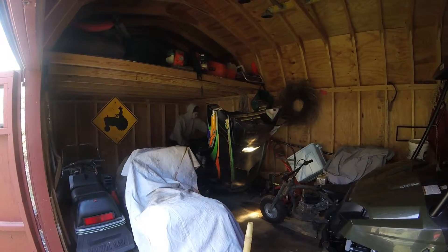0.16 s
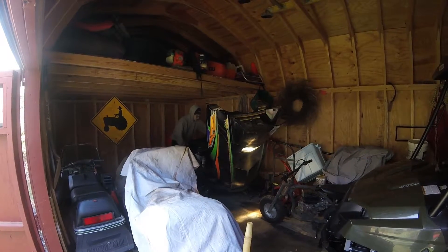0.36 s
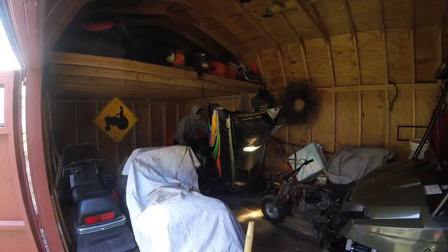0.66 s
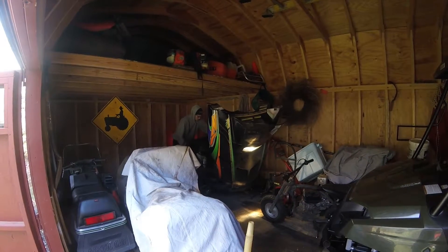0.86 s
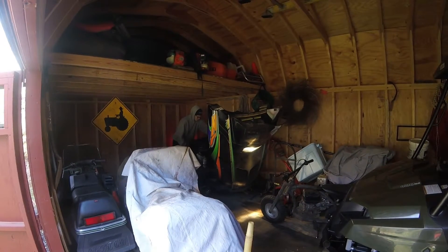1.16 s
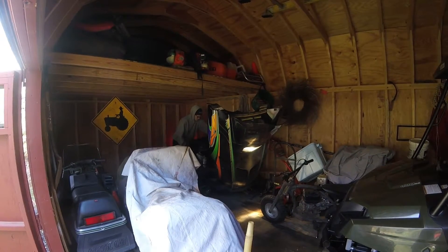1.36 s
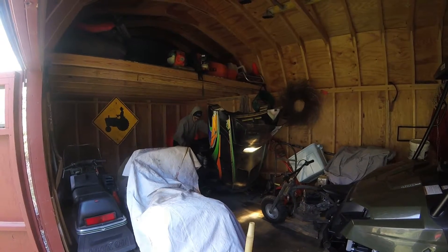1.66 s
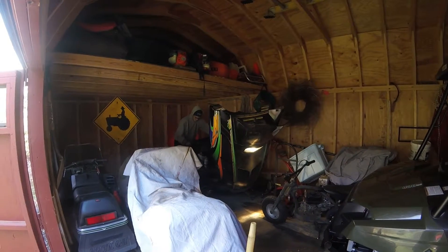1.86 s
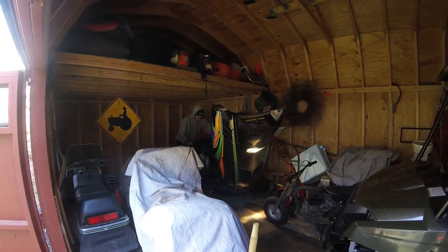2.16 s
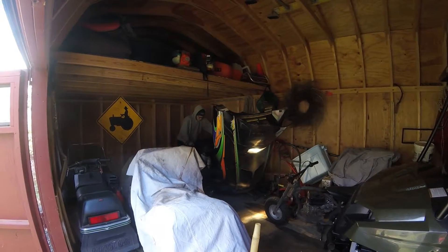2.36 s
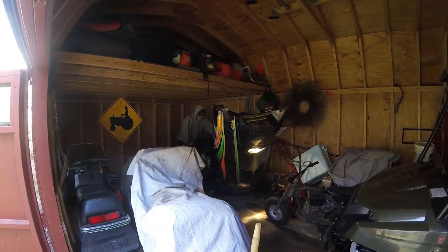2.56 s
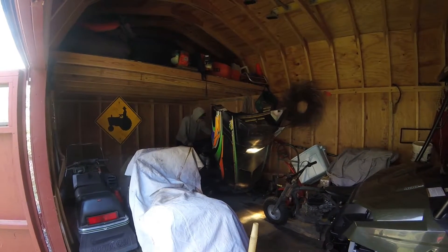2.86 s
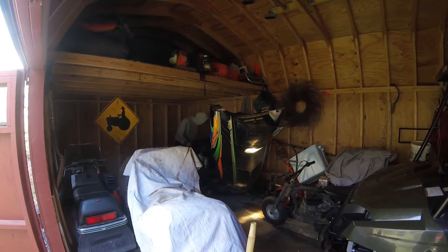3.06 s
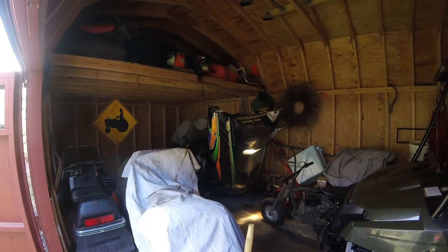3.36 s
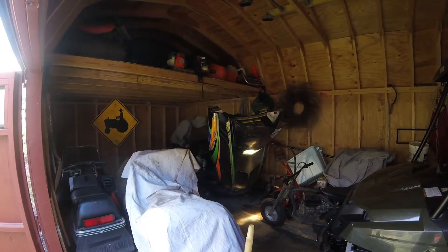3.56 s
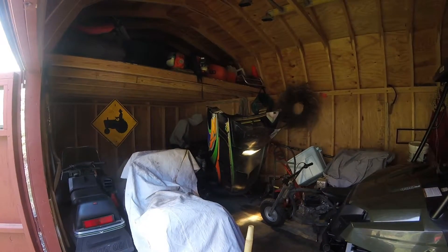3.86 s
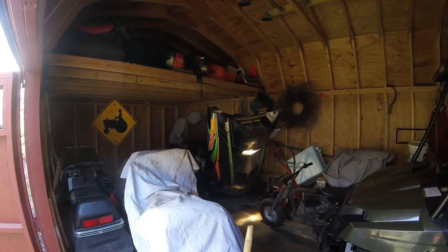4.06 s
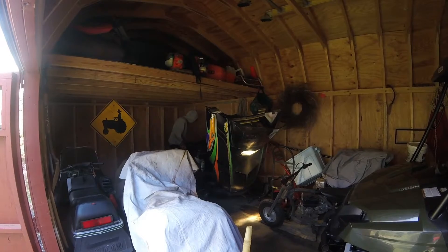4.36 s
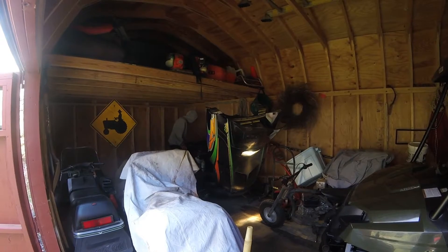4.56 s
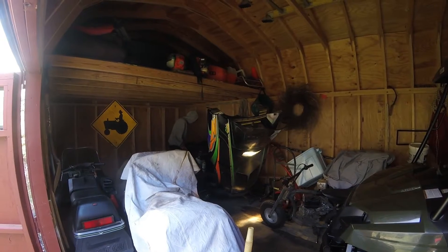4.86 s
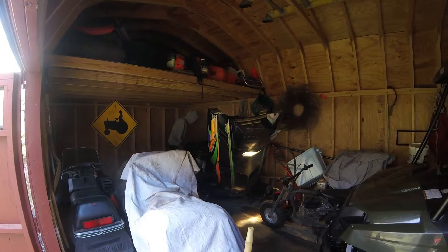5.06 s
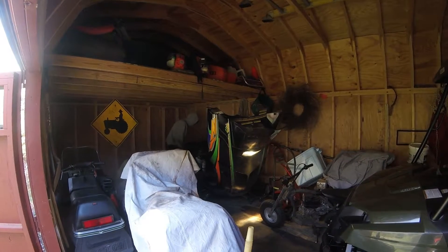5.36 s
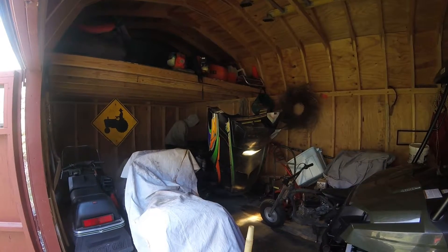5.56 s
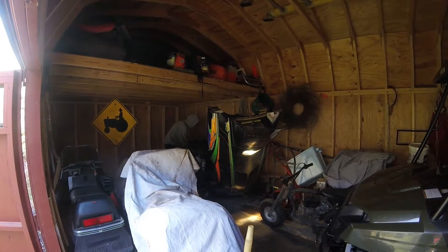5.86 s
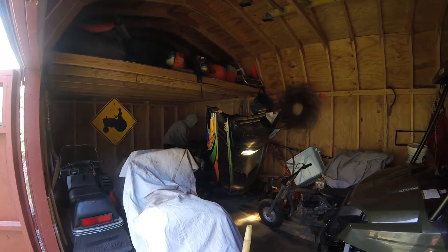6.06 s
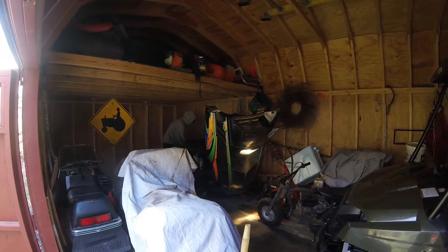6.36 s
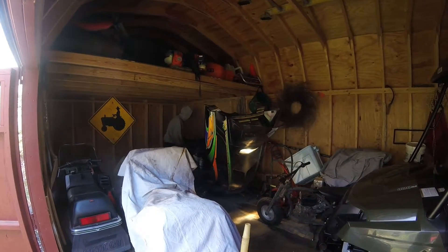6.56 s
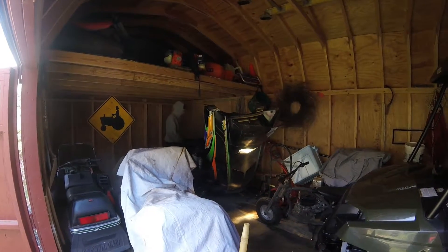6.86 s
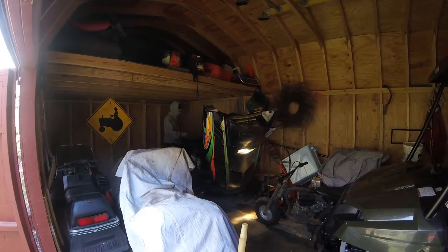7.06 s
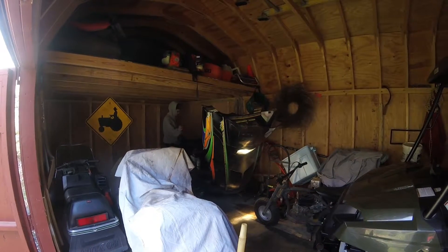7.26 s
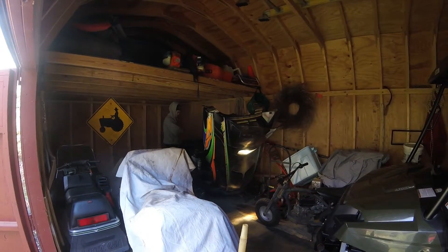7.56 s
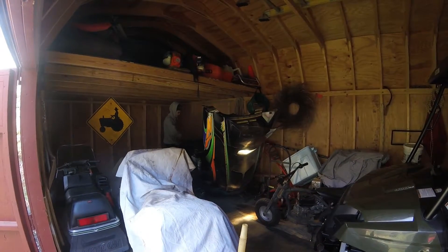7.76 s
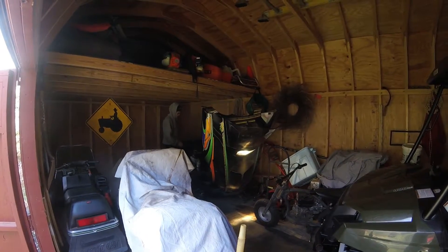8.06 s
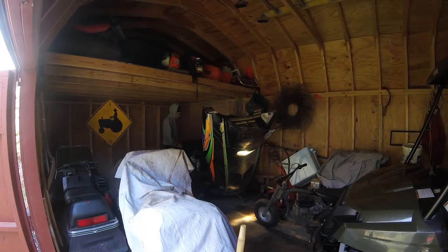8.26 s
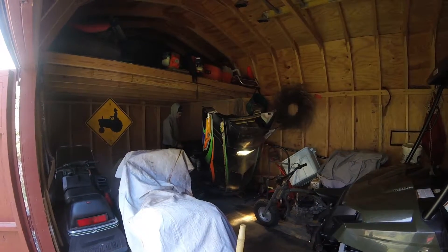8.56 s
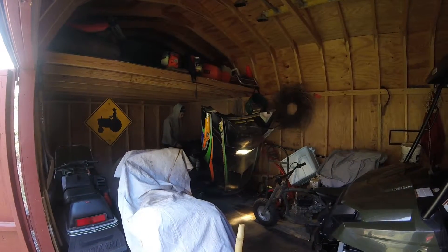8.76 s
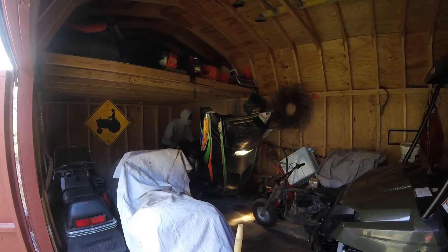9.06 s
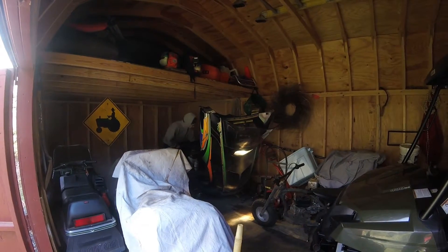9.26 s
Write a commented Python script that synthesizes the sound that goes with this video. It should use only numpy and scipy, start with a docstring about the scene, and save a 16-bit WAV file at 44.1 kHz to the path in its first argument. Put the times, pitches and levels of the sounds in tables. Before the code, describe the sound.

A two-stroke snowmobile engine is already idling at the start and runs without a break for about nine and a half seconds. Its exhaust makes a low, fast chug, topped by hollow, ringing pops at an uneven pace. Hard firings come roughly eight or nine times a second, each bringing a metallic knock and a bright jangle of loose parts. Panels hum on two wavering notes, sheet metal rings lightly, and faint, very high squeaks recur throughout. At about 0.8 and 1.3 seconds come two low, hollow gulps, and the drone dips briefly around 1.4 seconds. The engine runs a little softer until about 2 seconds, recovers by 3, and knocks and rattles slightly harder from about 6 seconds to the end. It is heard in mono on one microphone inside a wooden shed, with tight reflections and a slowly growing low boom.

```python
"""Snowmobile idling in a shed

A two-stroke warms up unevenly between close plank walls, heard on one microphone. Every stroke puffs
through the exhaust, but only some fire hard: the pipe pops, and the engine jerks, knocks and shakes
its loose drive parts. Panels hum, metal squeaks, the air booms. Twice, early on, comes a low gulp."""
import sys
import numpy as np
from scipy import signal
from scipy.fft import rfft, irfft
from scipy.io import wavfile

SR = 44100
rng = np.random.default_rng(int(sys.argv[2]) if len(sys.argv) > 2 else 0)


def bounce(signal):
    """Save signal as a 16-bit WAV file at the path given by the first command-line argument."""
    frames = np.transpose(np.atleast_2d(signal))
    limited = np.clip(frames, -1, 1)
    pcm = np.round(limited * 32767).astype(np.int16)
    wavfile.write(sys.argv[1], SR, pcm)


N = 415863
TIME = np.arange(N) / SR


def gain_of(db):
    """Decibels to amplitude."""
    return 10 ** (np.asarray(db) / 20)


def unit_rms(x):
    """Scales to rms 1."""
    return x / np.sqrt(np.mean(x ** 2) + 1e-20)


def curve(table, at=TIME):
    """Straight lines between the (time, value) rows of a table."""
    return np.interp(at, *np.transpose(table))


def bell(t, width):
    """A smooth bump of height 1 around t = 0."""
    return np.exp(-.5 * (t / width) ** 2)


def wander(hz, size=32768, step=16):
    """Slow random motion of rms 1, up to about hz."""
    rolloff = np.exp(-(np.fft.rfftfreq(size, step / SR) / hz) ** 2)
    slow = irfft(rfft(rng.standard_normal(size)) * rolloff)
    return unit_rms(np.interp(TIME, np.arange(size) * step / SR, slow))


def clicks(times, sizes):
    """A train of single impulses."""
    return np.bincount(np.clip(np.round(times * SR).astype(int), 0, N), sizes, N + 1)[:N]


def through(x, impulse):
    """Plays x through an impulse response."""
    return signal.oaconvolve(x, impulse)[:N]


def causal(gain):
    """Gives a gain per frequency the phase of a real body, which cannot ring before it is struck."""
    cepstrum = irfft(np.log(gain + 1e-12))
    half = len(cepstrum) // 2
    cepstrum[1:half] *= 2
    cepstrum[half + 1:] = 0
    return np.exp(rfft(cepstrum))


def body(spectrum, modes=(), size=16384):
    """Impulse response of a body with a broad spectrum and narrow resonances."""
    hz = np.fft.rfftfreq(size, 1 / SR)
    knot_hz, knot_db = np.transpose(spectrum)
    db = np.interp(np.log(hz + 1), np.log(knot_hz), knot_db)
    for centre, width, height in modes:
        db += height / (1 + (2 * (hz - centre) / width) ** 2)
    return irfft(causal(gain_of(db)))[:size // 2]


def shed(x, wet_db, t60=0.1, size=32768):
    """Close plank walls send a short, dense tail to the microphone, 3 ms behind the direct sound."""
    t = np.arange(size) / SR
    echoes = rng.standard_normal(size) * (rng.random(size) < .1)
    echoes *= gain_of(-60 * t / t60) * (t > .003)
    room = rfft(gain_of(wet_db) * echoes / np.linalg.norm(echoes) + (t == 0))
    # a large source sounds from many places, which evens out most of the room's peaks and dips
    impulse = irfft(room / causal(abs(room) ** .7))[:size // 2]
    return through(x, impulse / np.linalg.norm(impulse))


# how hard the engine runs between hard firings: t/s, level/dB
EFFORT = [(0, 3.5), (.6, -0.26), (1.05, -1.15), (1.6, -2.5), (2.9, 0), (4.5, 0), (5.3, -1.09), (6.3, .5),
          (8.3, 1), (9.43, -0.05)]
def running(db, follow):
    """Gain of a steady layer that follows the engine's effort by its own amount."""
    return gain_of(db + follow * curve(EFFORT))


# hard firings, each a jerk of the engine: t/s, knock level/dB, rattle level/dB
HARD_FIRINGS = [(.049, -31, -33.5), (.18, -31, -33), (.26, -37, -41.5), (.339, -31.5, -35),
                (.471, -34, -38), (.55, -36.5, -43), (.614, -32.5, -36), (0.732, -29.5, -37),
                (0.786, -31.5, -39), (.872, -36, -38), (.96, -36, -42), (1.056, -38, -42.5),
                (1.167, -31, -37.5), (1.232, -27.5, -37), (1.384, -33, -42), (1.549, -35, -42.5),
                (1.647, -33, -39.5), (1.767, -33.5, -38.5), (1.879, -33.5, -40), (1.992, -34, -40.5),
                (2.106, -32, -37.5), (2.258, -31.5, -37), (2.385, -30, -37), (2.522, -34, -37.5),
                (2.633, -32.5, -36.5), (2.74, -35, -40.5), (2.831, -31.5, -36.5), (2.942, -32, -39.5),
                (2.989, -34, -37), (3.061, -31.5, -36), (3.163, -31.5, -38), (3.268, -32, -37),
                (3.342, -33, -39), (3.415, -31, -35), (3.565, -26.5, -32.5), (3.693, -31.5, -39),
                (3.869, -36.5, -37.5), (4.002, -33.5, -38), (4.076, -32, -41), (4.173, -33.5, -38.5),
                (4.304, -31.5, -39), (4.391, -32.5, -36), (4.505, -30.5, -35), (4.645, -27.5, -36),
                (4.791, -29, -34.5), (4.923, -36, -38.5), (5.026, -34, -43), (5.132, -33.5, -36.5),
                (5.257, -32.5, -39), (5.364, -35.5, -42), (5.438, -32.5, -36.5), (5.584, -33.5, -37.5),
                (5.734, -27.5, -34.5), (5.863, -30, -35.5), (5.958, -30.5, -35.5), (6.133, -30.5, -34.5),
                (6.277, -30.5, -35), (6.357, -31.5, -37.5), (6.459, -32, -38), (6.582, -28.5, -34.5),
                (6.71, -31.5, -34), (6.844, -34.5, -40), (6.926, -29, -35), (7.054, -28, -35),
                (7.136, -38, -40), (7.219, -30, -35), (7.341, -30, -35.5), (7.457, -29, -33),
                (7.601, -30.5, -34.5), (7.66, -33.5, -40), (7.753, -28.5, -30.5), (7.892, -29.5, -31.5),
                (8.031, -31.5, -35), (8.187, -29.5, -34.5), (8.336, -29.5, -34.5), (8.449, -33, -38),
                (8.545, -28, -35), (8.632, -33, -42.5), (8.714, -28.5, -34), (8.857, -27, -32.5),
                (8.94, -34.5, -38), (9.005, -30, -41), (9.046, -29.5, -34.5), (9.164, -24.5, -31),
                (9.295, -28, -35)]
KNOCK, RATTLE = 1, 2  # columns
def firings(weak_gap_s=.055, jitter_s=.0054, spread_db=2, fade_db_per_s=-32, knock_db=-41, rattle_db=-45):
    """The hard firings, plus rows for weak ones that die down across each gap."""
    rows = list(HARD_FIRINGS)
    edges = [0] + [row[0] for row in HARD_FIRINGS] + [N / SR]
    for start, end in zip(edges, edges[1:]):
        for s in np.linspace(start, end, round((end - start) / weak_gap_s) + 1)[1:-1]:
            late, strength = rng.standard_normal(2)
            db = curve(EFFORT, s) + fade_db_per_s * (s - start) + spread_db * strength
            rows.append((s + jitter_s * late, knock_db + db, rattle_db + db))
    return np.array(rows)


def throb(*bumps, width_s, reach=8192):
    """Gain around each hard firing: bumps (offset/s, height/dB), of which only +-0.19 s acts."""
    t = np.arange(-reach, reach + 1) / SR
    shape_db = sum(db * bell(t - offset, width_s) for offset, db in bumps)
    jerks = clicks(np.array(HARD_FIRINGS)[:, 0], np.ones(len(HARD_FIRINGS)))
    return unit_rms(gain_of(signal.oaconvolve(jerks, shape_db, "same")))


def shaking(fired, column, lag_s, rise_s, sharpness, linger=.1, linger_s=.04016):
    """Power of the vibration that sets in just after each firing and dies away; a little lingers."""
    t = np.maximum(np.arange(SR) / SR - lag_s, 0)
    burst = (t / rise_s * np.exp(1 - t / rise_s)) ** sharpness
    tail = linger * t / linger_s * np.exp(1 - t / linger_s)
    jerks = clicks(fired[:, 0], gain_of(fired[:, column]) ** 2)
    return abs(through(jerks, burst + tail))


# underlying rate of piston strokes: t/s, f/Hz
STROKE_RATE = [(0, 65), (.3, 68.5), (.7, 68), (.9, 79), (1.25, 76), (1.4, 69.6), (1.8, 77.6), (2.4, 73.4),
               (2.9, 70.5), (3.3, 67.4), (3.8, 71.8), (4.5, 67.3), (4.9, 72), (5.7, 70.2), (6.6, 67.7),
               (7.3, 72.3), (8.4, 64.3), (9.43, 72)]
def crank(fired, kick=.018, flutter=.01):
    """Strokes counted so far: each jerk kicks the crank ahead, then it coasts."""
    push = np.sqrt(shaking(fired, RATTLE, lag_s=.01, rise_s=.028, sharpness=2))
    unevenness = kick * unit_rms(push - push.mean()) + flutter * wander(12)
    return np.cumsum(curve(STROKE_RATE) * (1 + unevenness)) / SR


def hum(hz, drift_hz, waver):
    """A lightly damped resonance, kept sounding and wavering in pitch and level."""
    turns = np.cumsum(hz + drift_hz * wander(8.91)) / SR
    return np.sqrt(2) * (1 + waver * wander(15)) * np.sin(2 * np.pi * turns)


def boom(hz=133.5, start_db=-45.8, warming_db_per_s=1.15):
    """The air around the microphone booms, more with effort and as the engine warms."""
    level = running(start_db + warming_db_per_s * TIME, follow=1.7)
    level *= throb((.025, 4), (-.5, -6), width_s=.2)
    return level * hum(hz, drift_hz=3.61, waver=.22)


# underlying hum of the higher and the lower panel: t/s, level/dB
HIGH_PANEL = [(0, -34.5), (1.85, -42), (2.35, -33), (2.6, -38), (2.85, -34.5), (3.25, -31.5), (3.78, -34.5),
              (4, -32), (4.22, -29), (4.4, -39), (4.7, -35.5), (5.25, -42), (6.2, -31), (6.75, -34),
              (7.15, -31), (7.7, -35.5), (8.5, -34.5), (9.15, -30.5), (9.43, -38)]
LOW_PANEL = [(0, -34.5), (1.3, -34.5), (1.85, -42), (2.5, -39), (3.15, -35), (3.6, -33.5), (3.95, -38),
             (4.5, -31), (5.2, -37), (5.7, -37), (6.3, -33.5), (6.95, -32.5), (7.8, -34.5), (8.3, -31),
             (8.6, -32), (9.43, -34)]
def panels(high_hz=414, low_hz=334.8):
    """Two panels hum along with the engine, each on its own note, throbbing with the jerks."""
    high = gain_of(curve(HIGH_PANEL)) * hum(high_hz, drift_hz=1.6, waver=.17)
    high *= throb((.2, 2.2), (0, -2.5), width_s=.6)
    low = gain_of(curve(LOW_PANEL)) * hum(low_hz, drift_hz=3.6, waver=.2)
    low *= throb((-.26, 5.5), (-.1, -4.5), width_s=.2)
    return high + low


# squeaks: peak t/s, relative level/dB, f/Hz
SQUEAKS = [(0.089, -47, 9500), (0.216, -53, 9500), (0.288, -54, 9470), (0.381, -52, 9500),
           (0.505, -53, 9530), (0.992, -51, 9570), (1.092, -44, 9470), (1.481, -51, 9480),
           (1.581, -42, 9450), (1.687, -50, 9490), (1.79, -49, 9520), (1.897, -49, 9500), (2.14, -52, 9570),
           (2.313, -49, 9500), (2.418, -50, 9500), (2.554, -50, 9550), (2.778, -51, 9460),
           (2.869, -49, 9490), (2.972, -51, 9500), (3.089, -52, 9480), (3.201, -47, 9460),
           (3.29, -53, 9590), (3.375, -49, 9560), (3.486, -48, 9550), (3.604, -50, 9490),
           (3.715, -50.5, 9500), (3.854, -50, 9490), (3.938, -48, 9460), (4.108, -49, 9440),
           (4.22, -50, 9480), (4.337, -50, 9420), (4.424, -52, 9500), (4.542, -50, 9400),
           (4.715, -46, 9460), (4.831, -46, 9510), (4.949, -48, 9510), (5.056, -48, 9390),
           (5.289, -50, 9420), (5.507, -47, 9470), (5.772, -48, 9450), (6.503, -49, 9490),
           (6.619, -48, 9500), (6.968, -46, 9460), (7.168, -53, 9470), (7.254, -48, 9480),
           (7.496, -48, 9440), (7.792, -51, 9480), (7.935, -46, 9440), (8.064, -52, 9480),
           (8.263, -54, 9390), (8.894, -55, 9570), (8.965, -51, 9450), (9.095, -46, 9520),
           (9.203, -54, 9500), (9.314, -53, 9470)]
# modes of the squeaking part: multiple of the pitch, relative level/dB
SQUEAK_MODES = [(1, -0.5), (1.24, -16.5), (1.413, -14)]
def squeaks(drift_hz=90, width_s=.0105, trim_db=.3):
    """Brief, fuzzy squeaks of rubbing metal as the engine shakes."""
    out = np.zeros(N)
    drift = drift_hz * wander(200)
    grain = unit_rms(1 + .55 * wander(220))
    for s, db, hz in SQUEAKS:
        near = slice(max(int((s - .04) * SR), 0), int((s + .04) * SR))
        phase = 2 * np.pi * np.cumsum(hz + drift[near]) / SR
        tone = sum(gain_of(mode_db) * np.sin(multiple * phase) for multiple, mode_db in SQUEAK_MODES)
        out[near] += np.sqrt(2) * gain_of(db + trim_db) * bell(TIME[near] - s, width_s) * tone
    return grain * out


# notes of the hood and block: f/Hz, level/dB relative to the knock
METAL_NOTES = [(1700, -6.5), (1458, -12.5), (1880, -16.5)]
def ringing(fired):
    """Sheet metal sings clear notes after each knock."""
    power = shaking(fired, KNOCK, lag_s=.0072, rise_s=.019, sharpness=1.5, linger=.18)
    return np.sqrt(power) * sum(gain_of(db) * hum(hz, drift_hz=9, waver=.3) for hz, db in METAL_NOTES)


# engine orders: multiple of the stroke rate, relative level/dB at the start and at the end
ORDERS = [(1 / 3, -16.5, -14.5), (2 / 3, -19.5, -18), (0.99, -0.3, -0.74), (2, -29, -25)]
def drone(strokes, level_db=-33.6, stumble_s=1.4, stumble_db=-9):
    """The engine's lowest orders fill the shed, and dip as it stumbles after the gulps."""
    out = np.zeros(N)
    for order, start_db, end_db in ORDERS:
        waver = 1 + .2 * (wander(11) + 1j * wander(15))  # in level and phase
        tone = (waver * np.exp(2j * np.pi * order * strokes)).real
        out += gain_of(np.linspace(start_db, end_db, N)) * tone
    level = running(level_db + stumble_db * bell(TIME - stumble_s, .11), follow=.46)
    return np.sqrt(2) * level * throb((.9, 5), (.5, -3.5), width_s=.4) * out


def chatter(strokes, per_s, spread_db, pulsing):
    """Many small metal contacts of unequal size, swelling slightly once a stroke."""
    sizes = gain_of(spread_db * np.minimum(rng.exponential(1, N), 4)) * rng.choice([-1, 1], N)
    touching = rng.random(N) < per_s / SR
    return sizes * touching * np.exp(pulsing * np.cos(2 * np.pi * strokes))


# spectrum of the loose parts: f/Hz, level/dB
RATTLE_SPECTRUM = [(1200, -13.5), (2200, -8), (2800, -10), (3500, -3.5), (4100, -9.5), (4700, -5.5),
                   (5350, 1.5), (5750, 0), (6100, -5), (6450, 1.5), (7400, -8.5), (9200, -12.5),
                   (10250, -16.5), (10800, -35), (13000, -42)]
# their resonances: f/Hz, width/Hz, level/dB above the spectrum
RATTLE_MODES = [(2690, 66, 8.7), (3200, 51, 3.2), (3300, 55, 3), (5210, 50, 2.5), (5400, 45, 2),
                (5600, 45, 2.5), (6420, 50, 2), (6570, 50, 1.5)]
def rattle(strokes, fired, idle_db=-43, shake_db=1.95):
    """Loose clutch parts and panels jangle whenever the engine jerks."""
    jolts = shaking(fired, RATTLE, lag_s=.008, rise_s=.015, sharpness=1.36, linger=.058)
    power = running(idle_db, follow=.63) ** 2 + gain_of(shake_db) ** 2 * jolts
    contacts = chatter(strokes, per_s=6000, spread_db=1.1, pulsing=.05)
    jangle = unit_rms(through(contacts, body(RATTLE_SPECTRUM, RATTLE_MODES)))
    return shed(np.sqrt(power) * jangle, wet_db=1.5, t60=.094)


# spectrum of the block and hood: f/Hz, level/dB
BLOCK_SPECTRUM = [(300, -37), (560, -9), (720, 1.5), (820, -5.5), (960, -4), (1100, 0.5), (1270, -1),
                  (1450, -0.5), (1750, -1.5), (1950, -5), (2300, -10.5), (3000, -13.5), (5000, -45.5),
                  (12000, -68)]
# their resonances: f/Hz, width/Hz, level/dB above the spectrum
BLOCK_MODES = [(872, 33, 8.1), (1404, 40, 2.5), (1620, 49, 3), (1697, 26, 4.4), (1870, 32, 2)]
def block(strokes, fired, idle_db=-36.5, knock_db=.9):
    """Piston slap and combustion knock in the block and hood."""
    knocks = shaking(fired, KNOCK, lag_s=.012, rise_s=.016, sharpness=1.53, linger=.14)
    power = running(idle_db, follow=1.1) ** 2 + gain_of(knock_db) ** 2 * knocks
    contacts = chatter(strokes, per_s=3800, spread_db=1.4, pulsing=.13)
    clatter = unit_rms(through(contacts, body(BLOCK_SPECTRUM, BLOCK_MODES)))
    return shed(np.sqrt(power) * clatter, wet_db=2.5)


def puffs(strokes, uneven_db, jitter_s, rough, decay_strokes):
    """Each opening of an exhaust port: a pressure pulse and a rush of gas, never twice alike."""
    times = TIME[1:][np.diff(np.floor(strokes)) > 0]
    strength, late = rng.standard_normal((2, len(times)))
    pulses = clicks(times + jitter_s * late, gain_of(uneven_db * np.clip(strength, -2, 2)))
    fundamental = np.cos(2 * np.pi * strokes)  # this steady part belongs to the drone
    pulses -= 2 * np.mean(pulses * fundamental) * fundamental
    rush = np.exp(-(strokes % 1) / decay_strokes) * rng.standard_normal(N)
    return unit_rms(pulses) + rough * unit_rms(rush)


# gulps: peak t/s, level/dB, half width/s
GULPS = [(0.775, -21.5, 0.062), (1.255, -21.5, 0.07)]
# their hollow spectrum: f/Hz, level/dB
GULP_SPECTRUM = [(40, -42), (100, -15), (160, -2), (330, -2), (420, -13), (520, -24), (2000, -67),
                 (12000, -100)]
def gulps(strokes):
    """Brief, hollow swells of low puffs, heard mostly off the walls."""
    gas = puffs(strokes, uneven_db=2, jitter_s=.0012, rough=1.7, decay_strokes=.73)
    hollow = shed(through(gas, body(GULP_SPECTRUM)), wet_db=7.5)
    out = np.zeros(N)
    for s, db, width_s in GULPS:
        swell = bell(TIME - s, width_s)
        out += gain_of(db) * np.sqrt(np.mean(swell ** 2)) * unit_rms(swell * hollow)
    return out


# spectrum of the muffler: f/Hz, level/dB
MUFFLER_SPECTRUM = [(15, -30), (40, -8), (55, -3), (70, -10.5), (88, -1), (115, -9.5), (170, -3.3),
                    (205, -8), (240, -3.5), (300, -8.5), (370, -2), (450, -7.5), (540, -13.5), (750, -16),
                    (1100, -28), (3000, -64.5), (12000, -100)]
# resonances of the shed: f/Hz, width/Hz, level/dB above the spectrum
SHED_MODES = [(128, 14, 1.5), (351, 22, 4), (365, 8.3, -4.5), (382.7, 27, 4.5), (494, 20, 10)]
def exhaust(strokes, fired, idle_db=-29, surge_db=.5):
    """Puffs leave the muffler and boom in the shed; each jerk swells them."""
    gas = puffs(strokes, uneven_db=3, jitter_s=.0011, rough=.91, decay_strokes=.37)
    surges = shaking(fired, KNOCK, lag_s=.012, rise_s=.023, sharpness=1.8)
    power = running(idle_db, follow=.74) ** 2 + gain_of(surge_db) ** 2 * surges
    chug = shed(through(gas, body(MUFFLER_SPECTRUM, SHED_MODES)), wet_db=5)
    return np.sqrt(power) * unit_rms(chug)


# spectrum of the exhaust pipe: f/Hz, level/dB
PIPE_SPECTRUM = [(200, -46), (550, -40), (574, -27), (592, -1.5), (610, -5.5), (624, -4), (645, 0),
                 (664, -4), (677, -26.5), (712, -18.5), (760, -31), (1500, -58), (12000, -100)]
# pops in the pipe, with the jerks and between them: peak t/s, relative level/dB, f/Hz
POPS = [(0.02, -18, 637), (0.052, -21, 613), (0.094, -17.5, 649), (0.146, -20.5, 626), (0.223, -17, 647),
        (0.291, -18.5, 638), (0.381, -16, 633), (0.435, -20.5, 626), (0.51, -16.5, 650), (0.577, -29, 631),
        (0.652, -20.5, 648.4), (0.721, -20, 630), (0.777, -19, 624), (0.812, -19, 646), (0.833, -19.5, 635),
        (0.909, -18.0, 622), (0.993, -22, 617), (1.055, -22, 627), (1.094, -21.5, 617), (1.2, -19, 619),
        (1.265, -20.0, 643.4), (1.322, -15.5, 628), (1.389, -23, 606), (1.425, -20.0, 617),
        (1.484, -21, 637), (1.582, -17, 628.7), (1.676, -18.5, 624), (1.806, -22, 632.5), (1.873, -26, 628),
        (1.915, -19.5, 648.4), (2.029, -18, 634), (2.081, -22, 636.5), (2.144, -17.5, 651),
        (2.212, -22.5, 624), (2.253, -24.0, 619), (2.299, -18.5, 643), (2.425, -18.5, 651.4),
        (2.487, -24.0, 628.5), (2.52, -25, 634), (2.561, -17.5, 647.4), (2.602, -21, 656),
        (2.656, -20, 624.7), (2.698, -20.5, 635.3), (2.757, -24, 631), (2.876, -20, 645),
        (2.929, -21.5, 633.7), (3.035, -25.5, 633), (3.073, -23.5, 617.3), (3.133, -22, 630.4),
        (3.168, -18.5, 634.3), (3.205, -18.5, 629.4), (3.262, -20.5, 634.3), (3.306, -18, 645),
        (3.371, -17, 631), (3.405, -21, 636.6), (3.447, -19.5, 634.4), (3.487, -20, 636.4),
        (3.531, -21, 621), (3.595, -21, 632.8), (3.673, -22, 628.3), (3.735, -19, 647), (3.828, -21, 623),
        (3.899, -18.5, 637.4), (3.936, -21, 646.4), (4.009, -24.5, 628), (4.04, -18.5, 642.7),
        (4.108, -18, 633.6), (4.141, -23, 646), (4.179, -19.5, 632), (4.223, -19, 631), (4.278, -24, 633.4),
        (4.375, -27, 629), (4.415, -20.5, 635.4), (4.445, -18.5, 640), (4.563, -22, 650),
        (4.601, -22.0, 622), (4.719, -20, 634), (4.762, -22, 626.6), (4.792, -22.5, 630.4),
        (4.823, -17.5, 643), (4.903, -23, 632.2), (4.964, -17, 646.6), (5.06, -22.5, 631),
        (5.176, -19, 650), (5.255, -22.5, 630.7), (5.302, -17, 639), (5.392, -22, 617), (5.429, -22, 628.4),
        (5.471, -19.5, 641), (5.51, -19, 627.7), (5.642, -24, 619), (5.701, -25, 624), (5.77, -26, 645),
        (5.831, -21, 627), (5.905, -19.5, 654), (6.003, -21.5, 627.7), (6.045, -21, 629),
        (6.103, -23.5, 636.7), (6.21, -21.5, 624), (6.334, -21.5, 644), (6.405, -21.5, 647),
        (6.45, -21, 616.5), (6.504, -19, 633), (6.547, -23, 619.3), (6.611, -19, 627.7), (6.685, -22, 630),
        (6.751, -15.5, 647), (6.818, -23, 627.7), (6.92, -27, 623), (7.006, -21.5, 622.3),
        (7.102, -18, 648), (7.166, -18, 622.6), (7.213, -23, 628.3), (7.276, -20, 637),
        (7.312, -22.5, 638.5), (7.394, -22, 610), (7.495, -19, 635.7), (7.585, -25, 635),
        (7.63, -23.5, 646.6), (7.69, -22, 624), (7.785, -18.5, 631.4), (7.849, -18, 626.5),
        (7.94, -19, 653.3), (7.992, -20, 627), (8.04, -22, 628), (8.084, -20, 632), (8.249, -24, 632),
        (8.296, -23, 628), (8.373, -23, 642), (8.498, -19, 630), (8.543, -23.5, 615.5),
        (8.653, -21.5, 621.7), (8.774, -19.5, 628.7), (8.939, -20.5, 614), (8.986, -20.5, 619),
        (9.046, -21.5, 627), (9.106, -20, 634), (9.146, -22, 617), (9.208, -18.5, 647), (9.263, -20, 619),
        (9.337, -16.5, 649), (9.405, -21, 627)]
def pipe(strokes, murmur_db=-27.9, pop_db=-.4, rise_s=.0093, fall_s=.0087, slide_hz_per_s=472):
    """The pipe, heard direct, hums under the weak strokes and rings with rising pitch at each pop."""
    gas = puffs(strokes, uneven_db=2, jitter_s=.00064, rough=.51, decay_strokes=.15)
    murmur = unit_rms(through(gas, body(PIPE_SPECTRUM)))
    murmur *= running(murmur_db, follow=.78) * throb((.2, -7), width_s=.1)
    pops, popping = np.zeros((2, N))
    for s, db, hz in POPS:
        near = slice(max(int((s - .05) * SR), 0), int((s + .06) * SR))
        t = TIME[near] - s
        envelope = bell(t, np.where(t < 0, rise_s, fall_s))
        turns = np.cumsum(hz + slide_hz_per_s * t) / SR + rng.random()
        pops[near] += np.sqrt(2) * gain_of(db + pop_db) * envelope * np.cos(2 * np.pi * turns)
        popping[near] += envelope
    # a pop takes the place of the weak strokes
    return pops + murmur * np.clip(1 - .8 * popping, 0, 1)


def scene():
    """Shed and engine as they meet at the microphone, in mono."""
    fired = firings()
    strokes = crank(fired)
    background = boom() + panels() + squeaks() + ringing(fired) + drone(strokes)
    machinery = rattle(strokes, fired) + block(strokes, fired)
    gas = gulps(strokes) + exhaust(strokes, fired) + pipe(strokes)
    return (background + machinery + gas)[None]


def record(dry, dull_hz=12800, edge_hz=13500):
    """The microphone dulls the top octave; a steep band limit follows."""
    dulled = signal.sosfilt(signal.butter(6, dull_hz, fs=SR, output="sos"), dry)
    band_limit = signal.firwin(511, edge_hz, window=("kaiser", 9), fs=SR)
    return signal.oaconvolve(dulled, band_limit[None], "same")


dry = scene()
out = record(dry)
bounce(out)
```